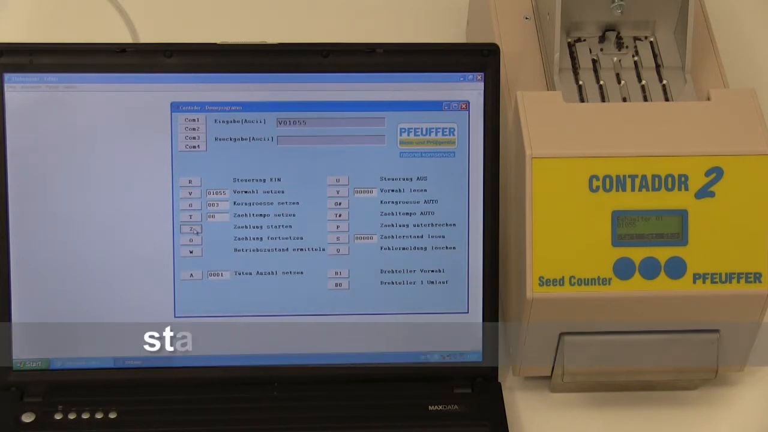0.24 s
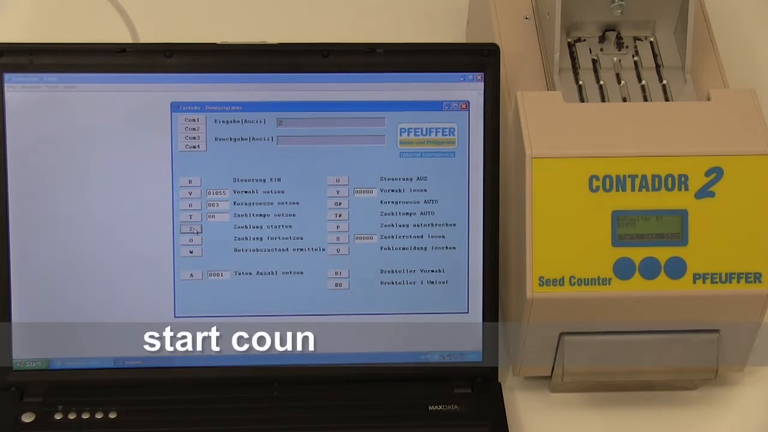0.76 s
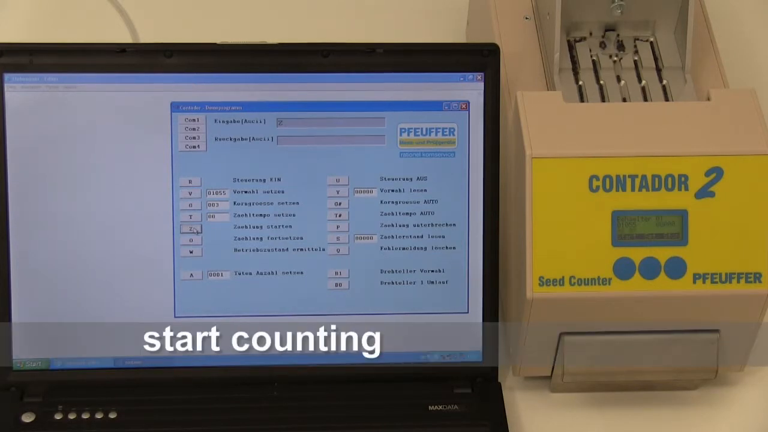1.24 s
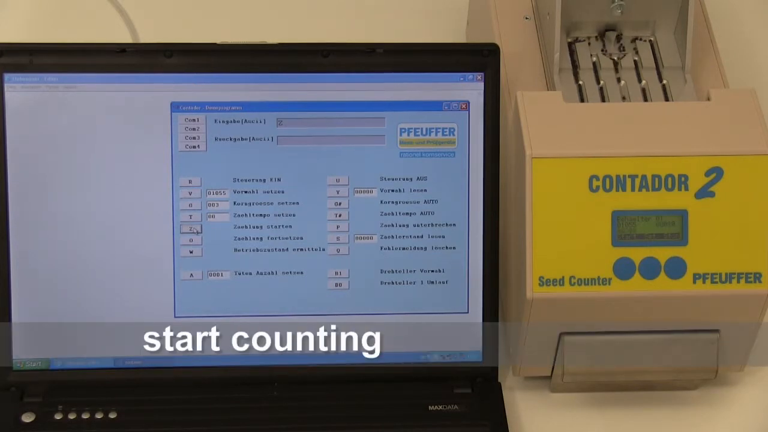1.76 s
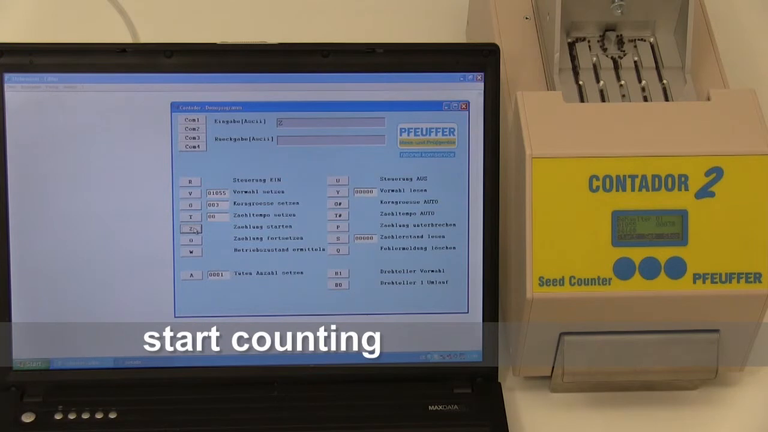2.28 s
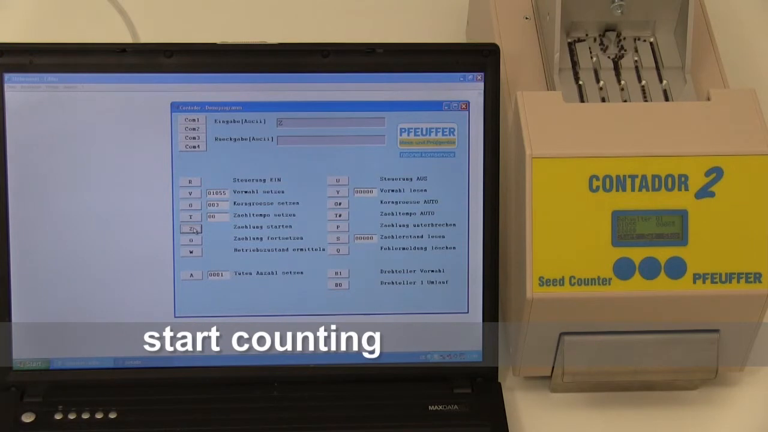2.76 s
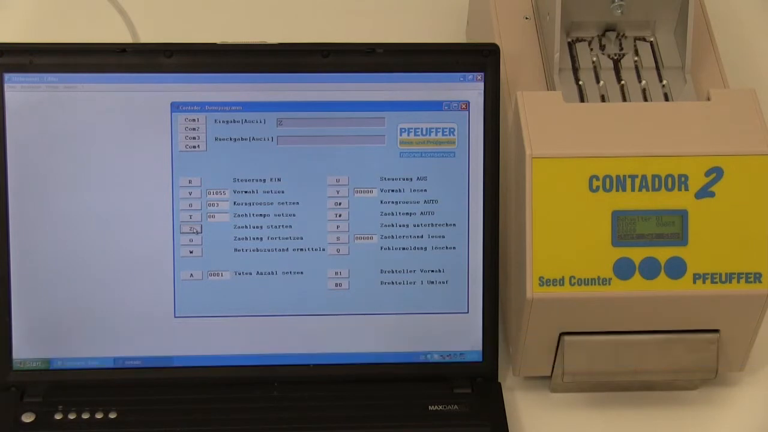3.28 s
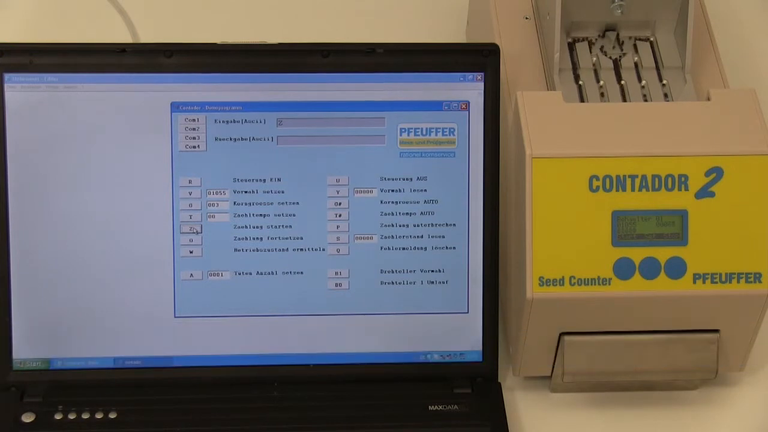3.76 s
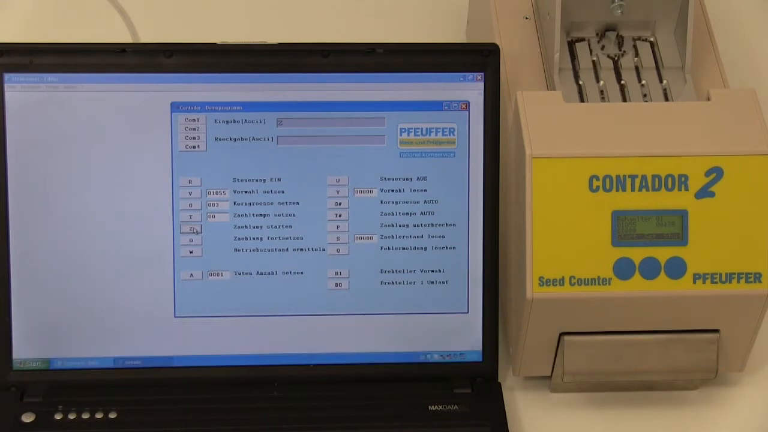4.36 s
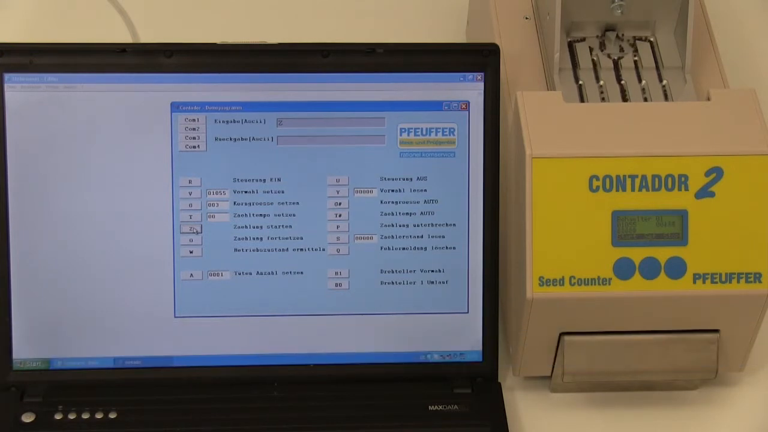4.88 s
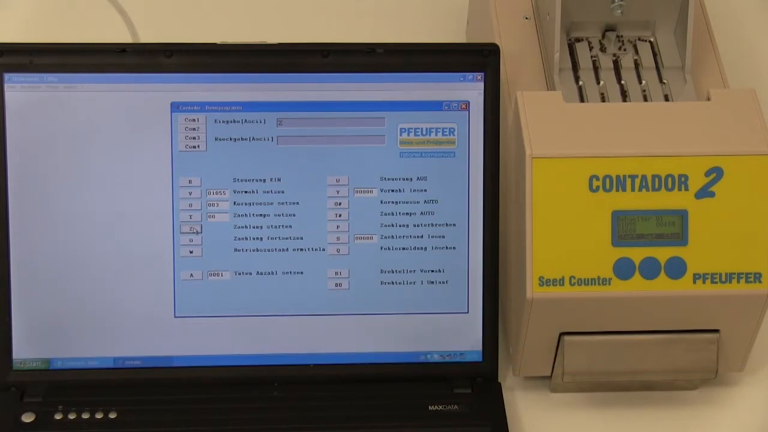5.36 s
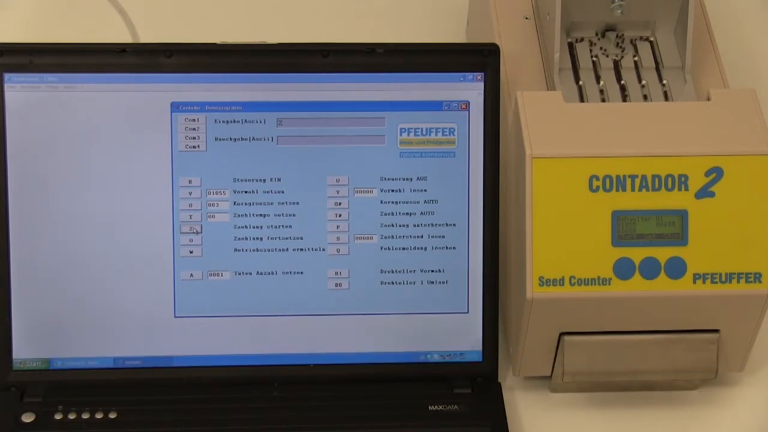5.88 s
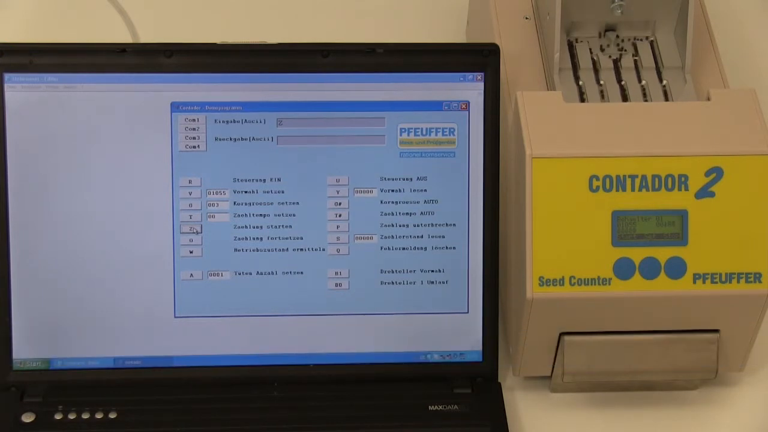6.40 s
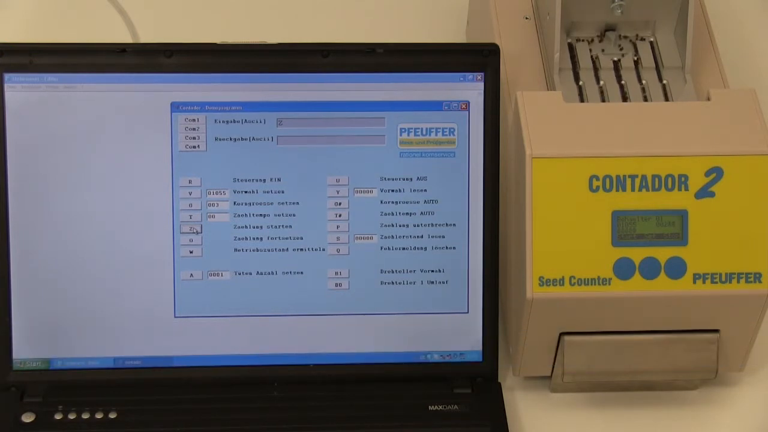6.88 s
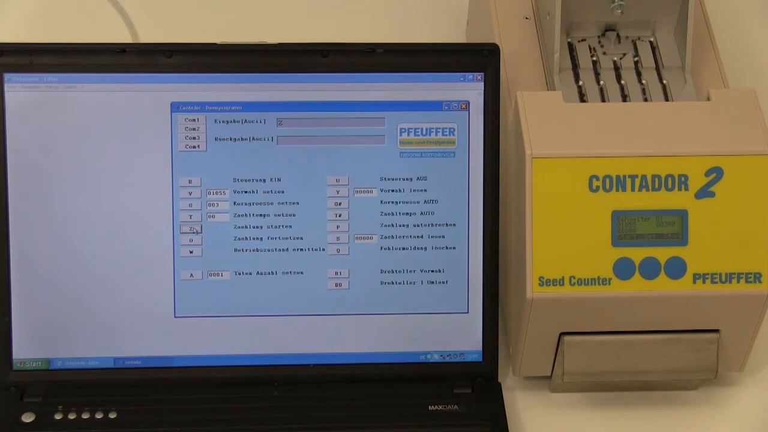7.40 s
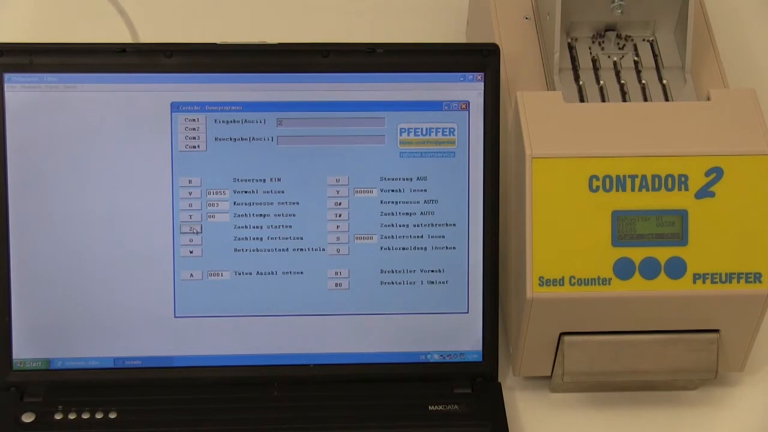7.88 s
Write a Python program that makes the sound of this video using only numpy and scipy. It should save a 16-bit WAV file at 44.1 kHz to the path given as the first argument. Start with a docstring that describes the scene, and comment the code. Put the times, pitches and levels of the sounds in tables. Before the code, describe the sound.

A sharp click, a soft thump, then a steady low electric buzz with ticking, metallic seed rattle that swells until the end.

```python
"""A small room with a bench seed counter, heard by two microphones: clicks arrive about as loud direct as by the room.
After the fading end of an earlier click a mouse button snaps, then the vibrating feeder starts with a thump and a
brief overshoot of its swing. Its magnet shakes a steel chute about 56 times a second, ever wider: sine orders make
the housing's hum and the chute's buzz. Showers of random landings, one in every cycle, tick and ring the chute and
tray; late on the seeds land on the tray twice a cycle. Behind lies faint ventilation and hiss of coloured noise."""
import sys
import numpy as np
from scipy import signal
from scipy.fft import rfft, irfft, next_fast_len
from scipy.io import wavfile
from scipy.ndimage import map_coordinates

SR = 44100
rng = np.random.default_rng(int(sys.argv[2]) if len(sys.argv) > 2 else 0)


def log_audio(samples):
    """Write samples as a 16-bit WAV file to the path given in sys.argv[1]."""
    # one column per channel
    frames = np.atleast_2d(samples).T
    # limit to full scale, then quantise
    limited = np.clip(frames, -1, 1)
    pcm = np.round(limited * 32767).astype(np.int16)
    wavfile.write(sys.argv[1], SR, pcm)


N = 358974

SHAKE_HZ = 55.716  # strokes of the magnet per second
START = 0.815  # s, the feeder is switched on


def amp(db):
    """Decibels to gain."""
    return 10 ** (np.asarray(db) / 20)


def unit(x):
    """Scaled to rms 1."""
    return x / np.sqrt(np.mean(x ** 2) + 1e-20)


def clock():
    """The time of every sample, in seconds."""
    return np.arange(N) / SR


def ramp(s, length):
    """From 0 at time s to 1 a length later."""
    return np.clip((clock() - s) / length, 0, 1)


def along(points, hz):
    """A curve through (frequency [Hz], value) points, on a log frequency axis."""
    f, v = np.transpose(points)
    return np.interp(np.log(hz + 1), np.log(f + 1), v)


def wobble(rate):
    """A smooth random curve, rate knots a second."""
    coarse = np.arange(0, N + 128, 128) / SR
    knots = rng.standard_normal(int(N * rate / SR) + 4)
    return np.interp(clock(), coarse, map_coordinates(knots, [coarse * rate]))


def filtered(x, response):
    """x through a complex response of frequency."""
    m = next_fast_len(N + SR // 2)
    spectrum = rfft(x, m) * response(np.fft.rfftfreq(m, 1 / SR))
    return irfft(spectrum, m)[..., :N]


def coloured(x, spectrum):
    """x through a broad (frequency [Hz], level [dB]) colour, at rms 1."""
    return unit(filtered(x, lambda hz: amp(along(spectrum, hz))))


def ring(x, modes):
    """x through parallel resonances (frequency [Hz], width [Hz], level [dB])."""
    def response(f):
        return sum(amp(db) * 1j * f * w / (c * c - f * f + 1j * f * w) for c, w, db in modes)
    return filtered(x, response)


# how alike the two microphones hear a diffuse sound: (frequency [Hz], correlation [-1 to 1])
LIKENESS = [(100, 0.71), (500, 0.5), (1500, 0.32), (6000, 0.64), (13000, 0.5)]


def spread(pair):
    """Two unrelated signals become left and right, as alike as the table says, at rms 1."""
    def mid_side_gains(hz):
        turn = np.arccos(np.clip(along(LIKENESS, hz), -1, 1)) / 2
        return np.array([np.cos(turn), np.sin(turn)])
    mid, side = filtered(pair, mid_side_gains)
    return unit(np.array([mid + side, mid - side]))


def panned(lean_db):
    """Left and right gains for a left-minus-right level difference."""
    return amp(np.array([[lean_db], [-lean_db]]) / 2)


DOUBLING_S = 4.79  # s after the start, when the swing has doubled


def swing():
    """The feeder's swing in dB over its first value; the amplitude grows at a constant rate."""
    return 20 * np.log10(1 + np.maximum(clock() - START, 0) / DOUBLING_S)


def surge(after, width):
    """The brief overshoot after switching on, 0-1."""
    return np.exp(-((clock() - START - after) / width) ** 2)


def running(delay, rise):
    """The feeder gathers swing exponentially after it is switched on."""
    return 1 - np.exp(-np.maximum(clock() - START - delay, 0) / rise)


# overshoot of the buzz and seeds: (time after the start [s], width [s])
RATTLE_SURGE = (0.16, 0.057)


def driven(law):
    """A layer's level in dB as the swing overshoots and then grows."""
    start_db, growth, surge_db = law
    return start_db + growth * swing() + surge_db * surge(*RATTLE_SURGE)


# level difference of the shaking orders between the microphones: (frequency [Hz], left minus right [dB])
STANDING_WAVES = [(167, -1.5), (223, 0.5), (279, 5.5), (334, -8), (390, -3), (500, 0.5), (560, -4.5),
                  (800, 5.5), (1000, 1.5), (1700, -3.5), (2400, -3.5)]


def partial(multiple, waver, skew, disorder, lead=0):
    """One order of the shaking; standing waves give it its own level and phase at each microphone."""
    cycles = clock() * SHAKE_HZ + .03
    phase = 2 * np.pi * multiple * cycles + lead + disorder * rng.standard_normal() + waver * wobble(3.0)
    apart = skew * rng.choice([-1, 1]) * np.array([[1], [-1]])
    tone = np.sqrt(2) * np.sin(phase + apart)  # rms 1
    return tone * panned(along(STANDING_WAVES, multiple * SHAKE_HZ))


# the hum's strong orders: (multiple of the shake rate, level at the start [dB], growth [dB per dB of swing],
# extra growth once loose [dB per dB], change in a hollow spell [dB], change in the overshoot [dB])
HUM_ORDERS = [(3, -49, 1.26, 0, 0.55, 3.5), (4, -54.5, 1.93, -0.9, -0.2, 9.5),
              (5, -46, 1.32, -5.5, -3, 3.5), (6, -68, 2.04, -1.7, 3.5, 0.5), (7, -61, 1.35, 2.9, -7.5, -10),
              (8, -67, 0.48, -0.6, 17, 11), (9, -52.7, 0.38, 0.2, -5.5, -5),
              (10, -53.5, -0.5, 2.5, 2.5, -0.8), (14, -65.5, 1.57, 1, -1.2, 5),
              (17, -58, 1.31, -2.7, -3.5, 2)]
# overshoot of the hum: (time after the start [s], width [s])
HOUSING_SURGE = (0.26, 0.072)
# spells in which the hum sounds more hollow: (start [s], end [s], depth [0-1])
HOLLOW_SPELLS = [(4.22, 5.95, 1), (6.08, 7.1, 0.75), (7.47, 8.3, 0.95)]
SPELL_EDGE_S = 0.16
LOOSE_SWING_DB = 5.5  # past this much growth of swing the balance of the orders shifts
# per multiple: phase drift [rad], left-right phase [rad], level drift [dB]
HUM_WAVER, HUM_SKEW, HUM_FLUTTER_DB = 0.0091, 0.031, 0.0843


def hum():
    """The housing follows the magnet's strokes with clean low orders, whose balance shifts as the swing grows."""
    swing_db, overshoot = swing(), surge(*HOUSING_SURGE)
    loose_db = np.maximum(swing_db - LOOSE_SWING_DB, 0)
    spell = np.zeros(N)
    for on, off, depth in HOLLOW_SPELLS:
        fade_in = ramp(on - SPELL_EDGE_S / 2, SPELL_EDGE_S)
        fade_out = ramp(off - SPELL_EDGE_S / 2, SPELL_EDGE_S)
        spell += depth * (fade_in - fade_out)
    out = np.zeros((2, N))
    for multiple, start_db, growth, loose_growth, spell_db, surge_db in HUM_ORDERS:
        k = round(multiple)
        level_db = start_db + growth * swing_db + loose_growth * loose_db
        level_db = level_db + spell_db * spell + surge_db * overshoot
        # push and pull: even orders get a quarter turn of lead over odd ones
        lead = np.pi / 2 * (k % 2 == 0)
        disorder = np.interp(k, [5, 7], [.2, 2.5])
        tone = partial(k, waver=HUM_WAVER * k, skew=HUM_SKEW * k, disorder=disorder, lead=lead)
        out += amp(level_db + HUM_FLUTTER_DB * k * wobble(4)) * tone
    return out * running(delay=0, rise=0.022)


# steady orders of housing and chute: (multiple of the shake rate, level at mid swing [dB])
BUZZ_ORDERS = [(1, -66.3), (2, -69), (11, -60), (12, -63.5), (13, -60.5), (15, -57.5), (16, -58), (18, -66),
               (22, -57), (23, -62), (24, -53), (26, -59), (27, -71.5), (28, -59.5), (29, -54), (30, -51.2),
               (31, -62), (33, -60), (34, -61), (35, -57.5), (37, -62), (38, -68), (39, -56.7), (40, -55),
               (41, -55), (42, -62.5), (43, -62), (45, -65)]
# high orders grow faster than low ones: (multiple, growth [dB per dB of buzz])
ORDER_GROWTH = [(2, -0.05), (14, 0.17), (24, 0.74), (35, 1.05), (40, 1.73)]
# how the buzz follows the swing: (level at the start [dB], growth [dB per dB of swing], overshoot [dB])
BUZZ_DRIVE = (-58.5, 1.404, 0.5)
# colour of the hard contacts: (frequency [Hz], relative level [dB])
CONTACT_COLOUR = [(2000, -36), (2500, -2), (3100, 5), (3900, 8), (4300, 2), (5500, -7), (8000, -48)]
STRIKE_PHASE, STRIKE_DB = 0.99, 26  # the one hardest contact: place in the cycle [0-1], level over the lesser ones [dB]


def buzz():
    """The chute knocks alike in every cycle; higher orders grow faster with the drive and waver more."""
    buzz_db = driven(BUZZ_DRIVE)
    change_db = buzz_db - np.median(buzz_db)
    out = np.zeros((2, N))
    for multiple, db in BUZZ_ORDERS:
        k = round(multiple)
        growth = np.interp(k, *np.transpose(ORDER_GROWTH))
        level_db = db + growth * change_db + 1.1 * wobble(1.226) + 1.0 * wobble(9)
        # the housing smears the low orders; the high ones arrive more nearly together, as a knock
        disorder = np.interp(k, [22, 29], [2.4, .8])
        out += amp(level_db) * partial(k, waver=0.0023 * k, skew=min(0.06 * k, .32), disorder=disorder)
    # a random pattern of contacts, repeated every cycle, gives the buzz its bright edge
    cycle = rng.standard_normal((2, round(SR / SHAKE_HZ)))
    length = cycle.shape[1]
    cycle[0, int(STRIKE_PHASE % 1 * length)] = amp(STRIKE_DB)
    place = (clock() * SHAKE_HZ % 1) * (length - 1)
    contacts = np.array([np.interp(place, np.arange(length), c) for c in cycle])
    edge = spread(coloured(contacts, CONTACT_COLOUR))
    return (out + amp(buzz_db - 0.5) * edge) * running(delay=0, rise=0.15)


def landings(rate, lag, build, throb_db, scatter_db, uneven_db):
    """Seeds land in a shower that starts lag cycles after the stroke, builds and thins out; no two are equal."""
    stroke, phase = np.divmod(clock() * SHAKE_HZ - lag + 1, 1)
    shower = amp(throb_db * np.interp(phase, [0, build, .85, 1], [-1.1, 0, -.9, -1]))
    hits = rng.random((2, N)) < rate / SR * unit(shower) ** 2
    toss_db = uneven_db * rng.standard_normal(N)[stroke.astype(int)]  # one draw per stroke
    signs = rng.choice([-1, 1], (2, N))
    sizes = signs * amp(toss_db + scatter_db * rng.standard_normal((2, N)))
    return spread(hits * sizes)


# colour of the dry ticks: (frequency [Hz], relative level [dB])
TICK_COLOUR = [(60, -12.5), (110, -6.5), (250, -1), (420, -1.5), (700, -8), (1300, -1), (2000, -3),
               (3100, -5.5), (4600, -1), (8500, 0.5), (9500, -3), (12200, -2), (12900, -8), (14500, -12)]
# ringing of the steel chute, with two faint high bands near 11.9 and 13.1 kHz that are not the chute's own:
# (frequency [Hz], width [Hz], relative level [dB])
CHUTE_AND_HIGH_BANDS = [(4440, 45, -7), (5620, 110, -9), (5730, 116, -7), (5870, 150, -8), (6108, 42, 5),
                        (7230, 54, -3), (7920, 90, -11), (8360, 80, -4), (8560, 70, -9), (10725, 43, -7),
                        (11880, 200, -14), (13060, 90, -14)]
# ringing of the tray: (frequency [Hz], width [Hz], relative level [dB])
TRAY_MODES = [(1700, 77, 8), (2253, 240, 12.5), (2365, 120, 0.5), (2500, 110, 6)]
# how dry ticks, steel, tray and drone follow the swing, before panning:
# (level at the start [dB], growth [dB per dB of swing], overshoot [dB])
TICK_DRIVE = (-45, 1.303, 6.2)
STEEL_DRIVE = (-44.5, 1.05, 2.3)
TRAY_DRIVE = (-58, 2, 7.3)
DRONE_DRIVE = (-58, 1.26, 1)
# from here the seeds leap high and land on the tray a second time in each cycle
LEAP_S, LEAP_RISE_S, LEAP_DB = 7.42, 0.12, -38.5


def seeds():
    """Landing seeds tick dryly, ring the steel chute (under two faint high bands) and make the tray chatter."""
    tick_hits = landings(rate=9000, lag=.48, build=.16, throb_db=1.0, scatter_db=2.0, uneven_db=0.72)
    ticks = coloured(tick_hits, TICK_COLOUR)
    steel_hits = landings(rate=4000, lag=.47, build=.16, throb_db=15, scatter_db=1.5, uneven_db=.5)
    steel = unit(ring(steel_hits, CHUTE_AND_HIGH_BANDS))
    tray_hits = landings(rate=1800, lag=.79, build=.1, throb_db=11, scatter_db=2.0, uneven_db=1.5)
    tray = unit(ring(tray_hits, TRAY_MODES))
    leap_hits = landings(rate=1000, lag=0.016, build=0.13, throb_db=6.5, scatter_db=2.5, uneven_db=1.5)
    leaps = unit(ring(leap_hits, TRAY_MODES[1:]))
    # the tray's lowest mode rings on from stroke to stroke
    drone_hits = landings(rate=900, lag=.5, build=.18, throb_db=7, scatter_db=2.5, uneven_db=3.2)
    drone = unit(ring(drone_hits, [(1250, 50, 0)]))

    rattle = amp(driven(TICK_DRIVE) + 0.22 * wobble(8)) * ticks
    rattle = rattle + amp(driven(STEEL_DRIVE) + 0.28 * wobble(15)) * steel
    chatter = amp(driven(TRAY_DRIVE) + 0.4 * wobble(6.1)) * tray
    chatter = chatter + amp(LEAP_DB) * ramp(LEAP_S, LEAP_RISE_S) * leaps
    chatter = chatter + amp(driven(DRONE_DRIVE)) * drone
    return (rattle * panned(-1.2) + chatter * panned(-0.6)) * running(delay=0.018, rise=0.032) ** 2


def blow(s, modes, contact, soft_hz):
    """A short rough contact rings the modes, duller the softer it is; peak 1."""
    age = clock() - s
    push = rng.standard_normal(N) * (age >= 0) * np.exp(-np.abs(age) / contact)
    softened = filtered(push, lambda hz: 1 / (1 + 1j * hz / soft_hz) ** 2)
    x = ring(softened, modes)
    return x / np.abs(x).max()


# decay of the small room: (frequency [Hz], time to fall 60 dB [s])
ROOM_DECAY = [(200, 1), (2000, 0.41), (7500, 0.6), (14000, 0.25)]


def room(x, wet_db):
    """The direct sound and a diffuse tail of decaying noise at each microphone."""
    hz, t, z = signal.stft(rng.standard_normal((2, SR // 2)), SR, nperseg=256)
    decay = amp(-60 * t / along(ROOM_DECAY, hz)[:, None])
    tail = signal.istft(z * decay, SR, nperseg=256)[1]
    tail = tail / np.linalg.norm(tail[0])
    return x + amp(wet_db) * signal.fftconvolve(x[None], tail, axes=1)[:, :N]


# snaps of the mouse button: (time [s], peak level before the bass cut and the room [dB])
BUTTON_SNAPS = [(0.317, -36), (0.3198, -25), (0.3212, -27), (0.3247, -30)]
# the mouse button's ring: (frequency [Hz], width [Hz], relative level [dB])
BUTTON_MODES = [(3300, 300, -4), (3720, 300, -4.5), (6650, 300, -16), (7600, 420, 1.5), (9160, 300, -18),
                (10000, 500, -15), (12000, 900, -9), (12850, 500, -7), (14000, 700, -7)]
# the housing's answer to the first stroke: (frequency [Hz], width [Hz], relative level [dB])
HOUSING_MODES = [(166, 12, -15), (291, 27, 14), (416, 37, 14.5), (520, 45, 14.5), (630, 40, 4),
                 (775, 66, 7), (905, 60, -3), (1130, 71, -10), (1420, 63, -23)]
# the fading end of an earlier click (first two rows), then single light ticks:
# (time [s], peak level before the room [dB], ring [Hz], width [Hz])
CLICK_END_AND_TICKS = [(0.001, -43.5, 7350, 200), (0.025, -49, 7360, 200), (0.856, -42, 5970, 60),
                       (1.305, -30, 6170, 58.8), (1.414, -30.5, 3450, 120), (1.429, -34, 3370, 90)]


def clicks():
    """An earlier click fades, the mouse button snaps, the feeder jolts into motion, and single light ticks sound."""
    button = sum(amp(db) * blow(s, BUTTON_MODES, contact=0.0012, soft_hz=40000) for s, db in BUTTON_SNAPS)
    # so small a switch radiates no bass
    button = filtered(button, lambda hz: (1j * hz / (2000 + 1j * hz)) ** 2)
    # the first stroke: a thin crack over the thump of the housing
    crack = amp(-39.5) * blow(START, [(2800, 500, 4), (5000, 900, -7)], contact=0.0034, soft_hz=7000)
    jolt = amp(-28) * blow(START, HOUSING_MODES, contact=0.042, soft_hz=2590)
    click_end_and_ticks = sum(amp(db) * blow(s, [(hz, width, 0)], contact=0.0041, soft_hz=15000)
                              for s, db, hz, width in CLICK_END_AND_TICKS)
    return room(button, wet_db=-2) + room(jolt + crack, wet_db=-1.5) + room(click_end_and_ticks, wet_db=0.5)


# colour of the empty room: (frequency [Hz], relative level [dB])
AIR_COLOUR = [(15, -62), (25, -36), (81, -12), (92, -15), (111, -6), (137, -19), (179, -3.5), (305, -8),
              (420, -11.5), (839, -13.5), (1100, -15), (7850, -29.5), (14500, -34.5)]


def air():
    """The room's faint ventilation and hiss: steady coloured noise, diffuse at the two microphones."""
    return amp(-56.5) * spread(coloured(rng.standard_normal((2, N)), AIR_COLOUR))


def scene():
    """The feeder, the clicks and the room."""
    return hum() + buzz() + seeds() + clicks() + air()


def record(dry):
    """The microphones' channel keeps nothing from its 14600 Hz band limit up."""
    return filtered(dry, lambda hz: hz < 14600)


dry = scene()
out = record(dry)
log_audio(out)
```